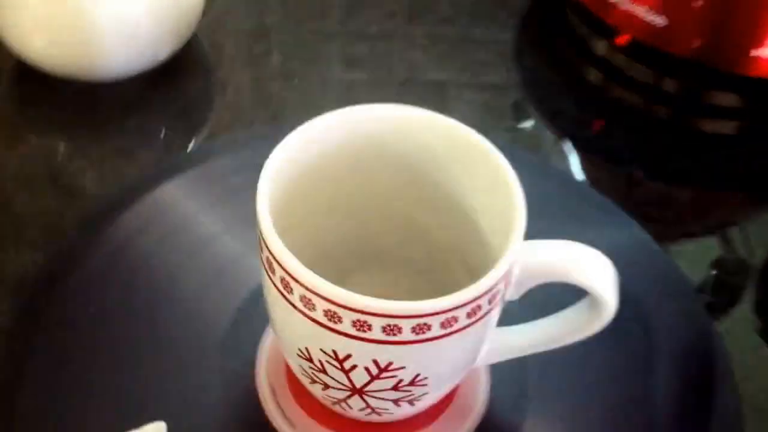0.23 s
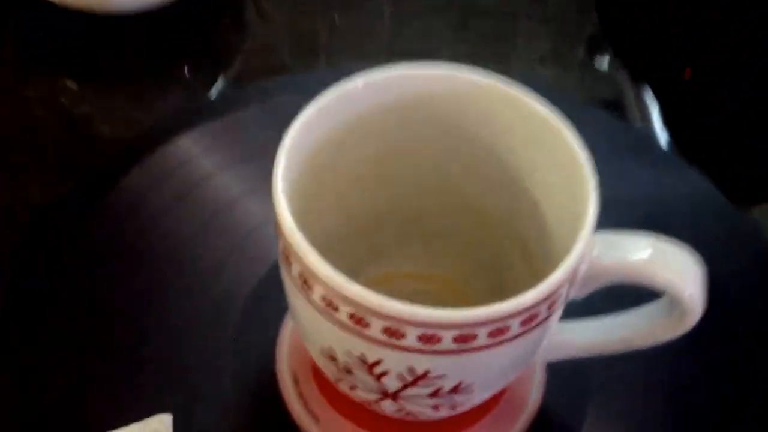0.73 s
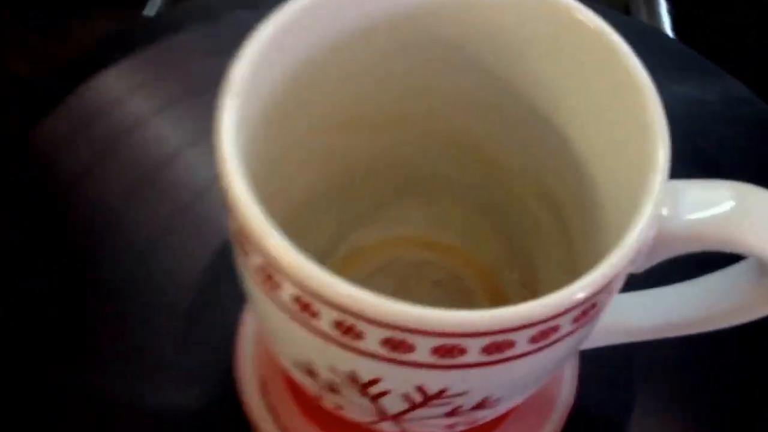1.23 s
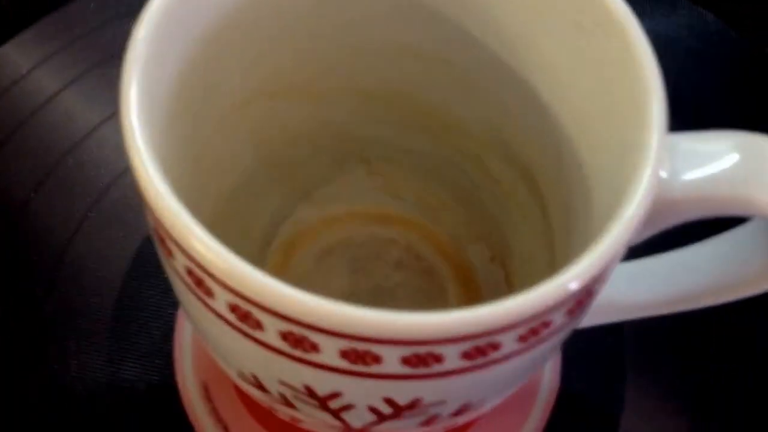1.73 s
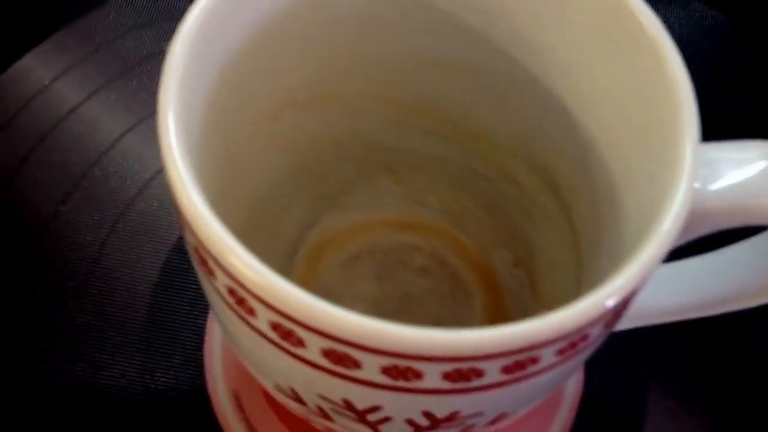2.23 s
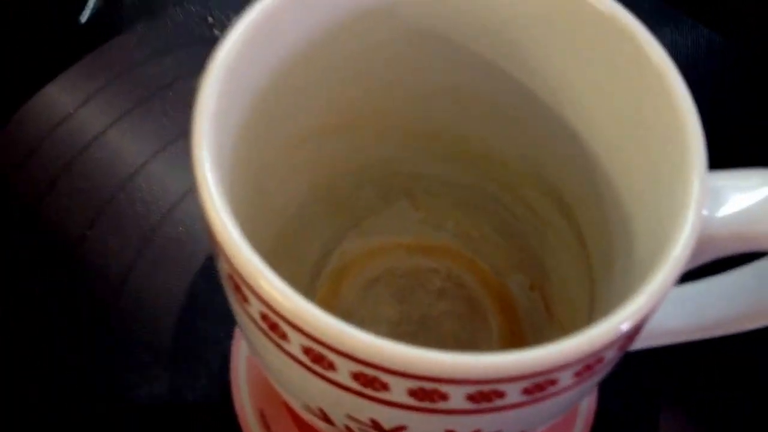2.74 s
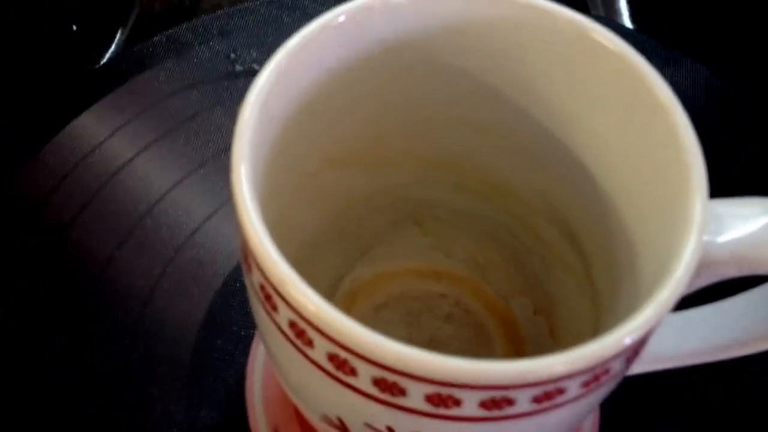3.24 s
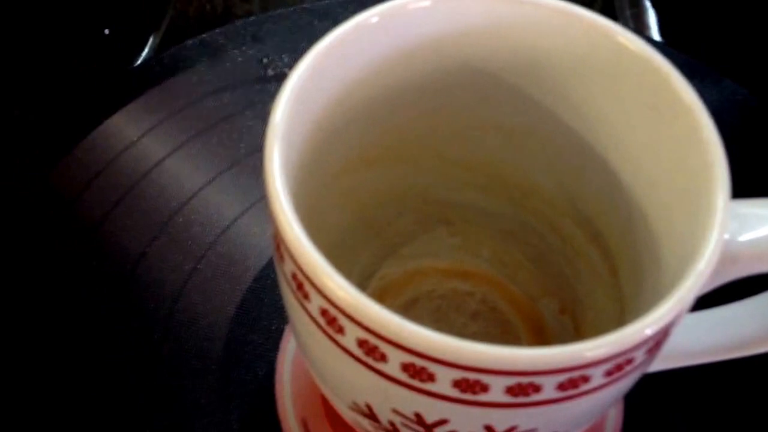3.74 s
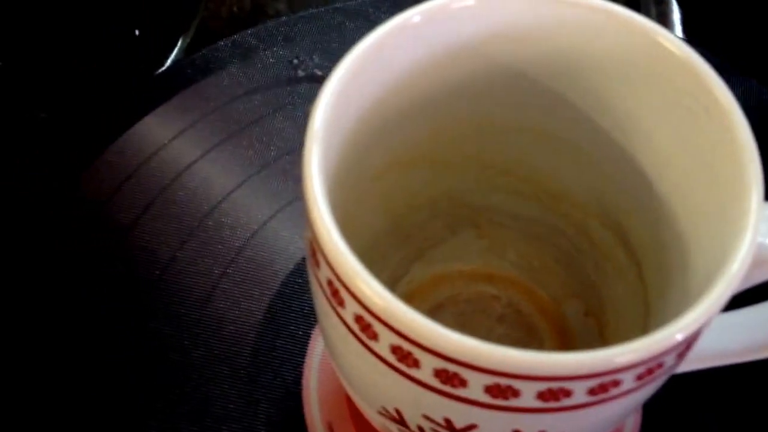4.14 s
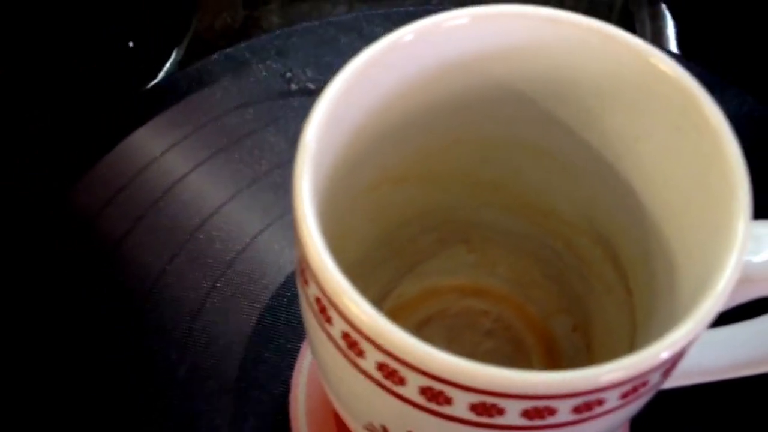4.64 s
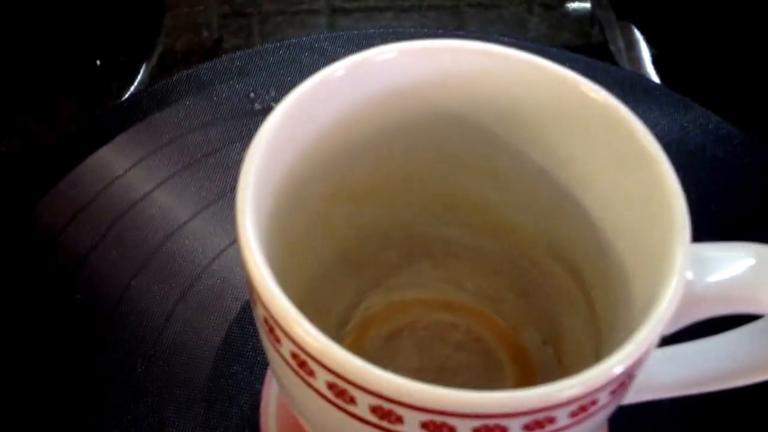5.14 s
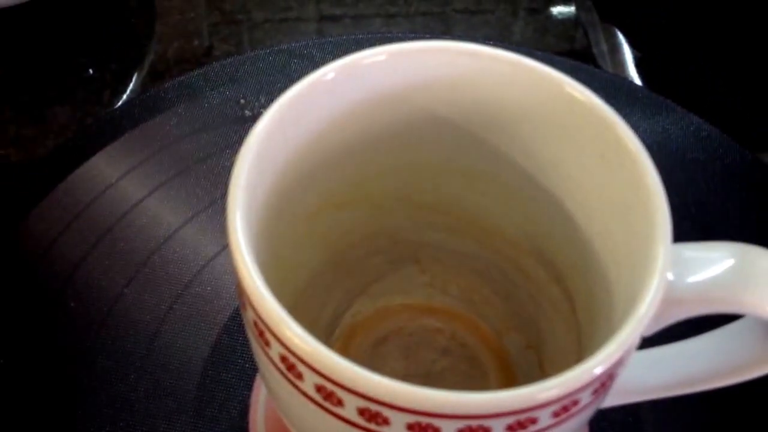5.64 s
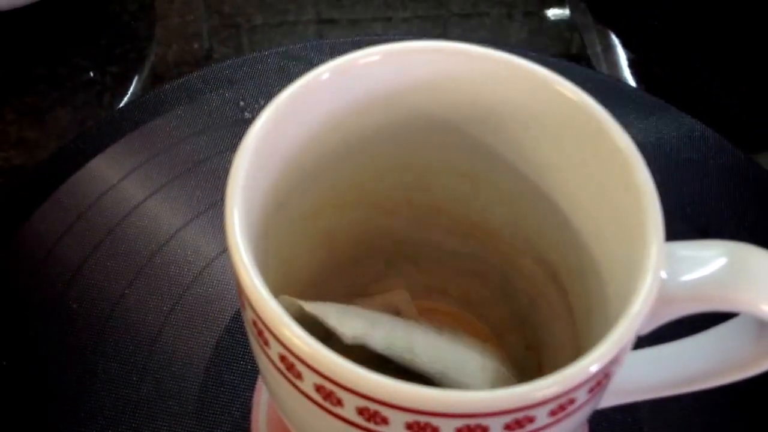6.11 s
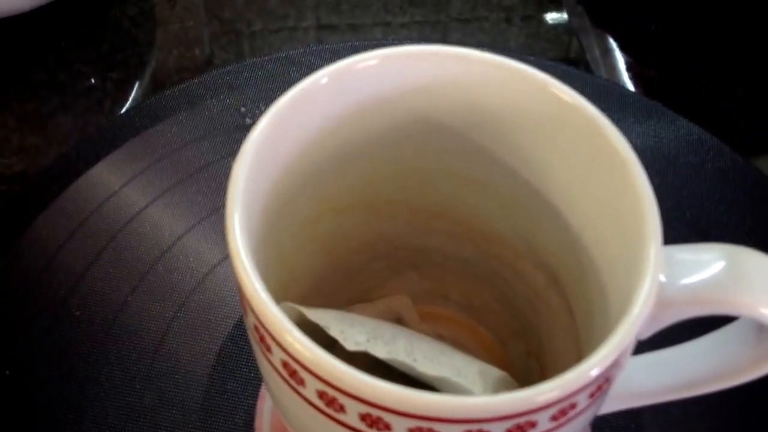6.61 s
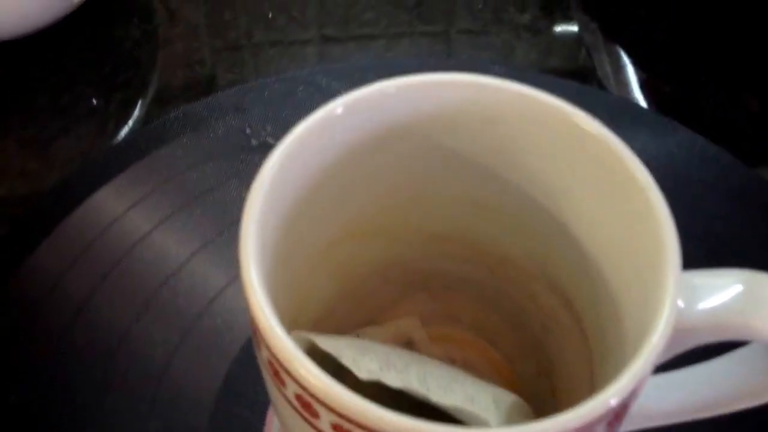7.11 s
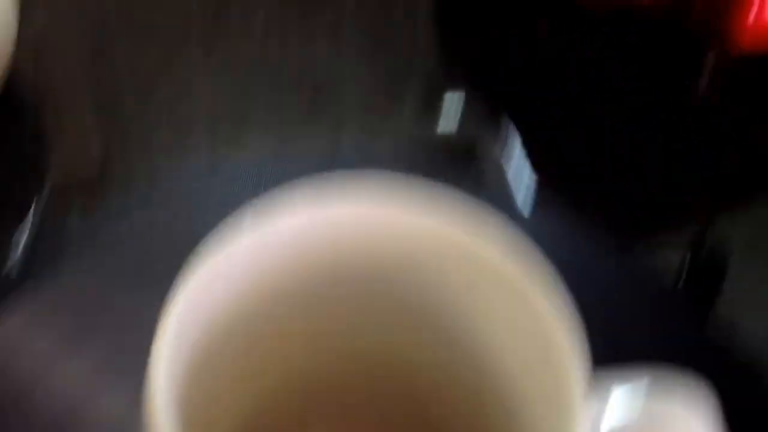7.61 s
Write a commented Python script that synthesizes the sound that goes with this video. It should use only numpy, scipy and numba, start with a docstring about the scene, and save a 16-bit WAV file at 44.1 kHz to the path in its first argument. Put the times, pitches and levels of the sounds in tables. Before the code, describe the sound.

From the start an electric kettle is boiling hard: a deep, fluttering rumble around the low hundreds of hertz, gurgling mid tones, a grainy metallic ringing from the steel wall that sings a little more around 1 second, and soft flickering steam. At about 2.1 the heating ends, but the boil holds until 2.5, where one small dull bubble snap sounds. At 2.95 the switch slips faintly, then snaps with a loud bright clack at 2.98, followed by tiny rattles until 3.1. A thin high hiss swells to 3.5 and vanishes. The rumble and bubbling ebb slowly. At 6.13 to 6.18 a tea bag makes two or three crisp papery ticks against a mug. From 7.57 the boil falls quickly, treble first, as the phone turns; a finger knocks its case at 7.64, with faint ticks and rising sliding to the end. Small kitchen echo, slight microphone hiss.

```python
"""Kettle boiling and switching off

An electric kettle boils on a kitchen counter, close to a hand-held phone, and its switch snaps off.
Big bubbles drum the body, small ones ring the steel wall, and steam hisses; all ebb as the water calms.
A tea bag drops into a mug with a paper crinkle, and a finger taps and slides on the phone case.
Bubbles and blows are random ticks sent through ringing filters; steam is coloured noise.
The phone colours the sound, adds its own hiss and turns itself down after loud peaks.
"""
import sys
import numpy as np
from scipy import signal
from scipy.fft import rfft, irfft, next_fast_len
from scipy.io import wavfile
from scipy.ndimage import uniform_filter1d
from numba import njit

SR = 44100
rng = np.random.default_rng(int(sys.argv[2]) if len(sys.argv) > 2 else 0)


def put_to_file(sound):
    """Save the sound as 16-bit audio at rate SR, in the file named by the first command-line argument."""
    columns = np.atleast_2d(sound).T  # one column per channel
    safe = np.clip(columns, -1, 1)
    whole_steps = np.round(safe * 32767)
    wavfile.write(sys.argv[1], SR, whole_steps.astype(np.int16))


N = 346626
T = np.arange(N) / SR  # time of each sample, s
SIZE = next_fast_len(N + SR)  # spare room lets echoes die out
HZ = np.arange(SIZE // 2 + 1) * SR / SIZE + 1e-3  # tiny offset avoids dividing by zero

# Kettle body, drummed by big bubbles [f/Hz, width/Hz, level/dB]
BODY_MODES = [(90.5, 38, -19.5), (166.3, 32, 1.5), (215, 61, -4), (265.2, 43, -0.5), (540.5, 108, -20),
              (317, 36, -25), (621, 110, -22), (743, 128, -19)]
# Air under the lid [f/Hz, width/Hz, level/dB]
LID_AIR_MODES = [(393.8, 49.3, 3), (428, 30, -4.5)]
# Gurgling water [f/Hz, width/Hz, level/dB]
GURGLE_MODES = [(906, 140, 0.53), (1085, 380, 0.1)]
# Steel wall [f/Hz, width/Hz, level/dB, lift while the phone hovers over the mug/dB]
WALL_MODES = [(1415, 112, -6, 1), (1518, 89, -5.5, 1), (1617, 71, 0, 0.5), (1734, 126, 1, -5.5),
              (1836, 91, 1.5, -1.5), (1968, 150, -3.5, 0), (2108, 100, -6.5, -4), (2210, 125, -3, -1),
              (2424, 310, -7.5, -0.5), (2580, 103, -6, 1), (2682, 70, -5, 6), (2786, 220, -8, -5.5),
              (2943, 130, -10, 4.5), (3200, 224, -6, -2), (3840, 2100, -16.5, -1.5), (3870, 230, -19.5, -2)]
# Colour of the steam hiss [f/Hz, level/dB]
STEAM_COLOUR = [(3000, -18), (5000, -4), (6200, -0.5), (6750, 4), (7100, -3.5), (7550, 1.5), (8200, -2),
                (9000, -4), (11000, -4), (15000, -2)]
# Colour of a thin, high hiss [f/Hz, level/dB]
THIN_HISS_COLOUR = [(3000, -25), (5000, -12), (10000, -3), (12500, -1), (15000, -1)]

# Switch: the lever slips, catches, snaps over, bounces, rattles out
# [t/s, level/dB, fade time/s, treble tilt/dB]
SWITCH_BLOWS = [(2.9505, -29, 0.0087, -10), (2.966, -27, 0.0044, -8), (2.9725, -24, 0.0025, -5),
                (2.9754, -10, 0.0021, 3.5), (2.9768, -7, 0.0019, 4), (2.9795, -10, 0.002, 5),
                (2.9825, -12, 0.0041, 0), (2.987, -24, 0.0055, -3), (2.995, -25, 0.0071, 0),
                (3.007, -22.5, 0.0057, -10), (3.019, -27, 0.0093, -12), (3.028, -35, 0.0091, -10),
                (3.038, -32, 0.0074, -13), (3.047, -33, 0.0066, -15), (3.056, -34, .006, -7),
                (3.075, -38, 0.0084, -5), (3.09, -47, .02, -2)]
# Broad clack of the switch [f/Hz, level/dB]
CLACK_COLOUR = [(60, -6), (300, -7), (600, -8), (1000, 2.5), (2500, -6.5), (4600, 5), (6000, 2.5),
                (8000, 9.5), (11000, 5.5), (15000, -1)]
# Rings of lever and body [f/Hz, level/dB, time to fade by 60 dB/s]
SWITCH_RINGS = [(275, -32, 0.057), (528, -36.5, 0.079), (880, -33, 0.015), (1410, -33.5, 0.037),
                (2170, -37, .015), (2580, -24.5, 0.013), (3020, -38, .01), (3350, -37, 0.015),
                (4480, -24.5, 0.006), (7400, -30, 0.012), (7965, -28.5, 0.032), (8900, -35, .016),
                (11300, -26, .008)]

# A lone bubble snaps against the wall [t/s, level/dB]
POP_TIMES = [(2.51, -21)]
# Colour of that snap [f/Hz, level/dB]
POP_COLOUR = [(800, -25), (1600, 2), (2900, 6), (4200, -14), (8000, -30)]

# Tea bag: touches the mug, folds, settles [t/s, level/dB, fade time/s, treble tilt/dB]
TEA_BAG_BLOWS = [(6.1348, -18, 0.0013, -4), (6.1355, -21, .0018, -2), (6.139, -33, 0.013, 0),
                 (6.1557, -19, 0.00089, -3), (6.1575, -23, 0.0022, 6), (6.1645, -30, .002, 3),
                 (6.1615, -25, .0025, 1), (6.169, -34, .003, 2), (6.172, -45, .03, 7),
                 (6.1815, -35, 0.005, 3)]
# Colour of the crinkling paper [f/Hz, level/dB]
PAPER_COLOUR = [(900, -15), (1800, -11), (3300, -1.5), (4600, -8.5), (8000, -1), (12000, 5), (15000, -6)]
# Rings of the mug [f/Hz, level/dB, time to fade by 60 dB/s]
MUG_RINGS = [(2240, -32, 0.022), (2930, -29.5, 0.014), (3570, -43, .01), (4400, -39, .008),
             (7200, -41, .01)]

# Finger on the phone case [t/s, push level/dB, contact time/ms, tick level/dB]
FINGER_TAPS = [(7.6427, -15, 0.86, -25), (7.647, -37, .7, -40), (7.654, -42, .85, -34),
               (7.68, -42, 0.95, -30), (7.71, -45, .6, -47), (7.791, -49, 0.52, -40)]
# The case passes little bass [f/Hz, level/dB]
CASE_COLOUR = [(200, -12), (450, 4), (850, -4), (1600, -3), (2800, 6.5), (4200, 4)]
# Rings of the case [f/Hz, level/dB, time to fade by 60 dB/s]
CASE_RINGS = [(235, -21, .04), (845, -26.5, 0.0078), (2600, -21, 0.0022)]
# Colour of skin ticking and sliding [f/Hz, level/dB]
SKIN_COLOUR = [(2500, -23), (4000, -4), (5200, 6), (6500, -5), (8000, -9.5), (10500, -1), (13000, 4),
               (15000, 7)]

# Microphone port: bass cut, a notch from the case, a treble peak [f/Hz, level/dB]
MICROPHONE_COLOUR = [(20, -7), (70, -16), (130, 1.5), (200, 0), (3500, -0.5), (4400, -9.5), (5100, -19.5),
                     (6000, -10.5), (7500, 1), (9200, -7), (10200, -16), (12500, -16), (15000, -21.5)]

OFF_S, STORED_HEAT_S = 2.07, 0.42  # the element goes off; the plate stays hot a little longer
TURN_S, TURN_DB_S, TURN_TREBLE_DB_S = 7.57, -8.5, -34  # the phone swings aside, treble drops fastest
HOVER_S, HOVER_FADE_S = (1.4, 2.86), 0.16  # the phone hovers over the mug; half of each fade
SINGING_HZ, SINGING_OCTAVES = 1850, 0.16  # wall modes near this pitch sing out early on
CHURN_DB, CHURN_PER_S, CHURN_OCTAVES = 7, 38, 0.6  # clusters of bubbles near the singing pitch
CHURN_EVEN_S = 0.14  # the clusters even out over this time
KITCHEN_T60_S, KITCHEN_DB, BOIL_ECHO_DB, MUG_ECHO_DB = 0.28, -12, -12, -17  # echo fade and levels
SELF_NOISE_DB = -49  # microphone hiss, before its colour
GAIN_TOP_DB, GAIN_SLOPE = -23, 0.56  # above this level the phone turns down this share of the excess
GAIN_ATTACK_S, GAIN_RELEASE_S = 0.017, 1.88
CEILING, TOP_HZ = 0.84, 15350  # soft clipping ceiling (full scale is 1); top cut


def kettle():
    """Adds six boiling noises; bursts at the surface make the upper ones surge, save the thin hiss."""
    surge = surges(30, 0.0073)
    rush = gurgling(surge) + ringing_wall(surge) + steam_hiss(surge) + thin_hiss()
    # the kettle stands further off, so its rush carries some echo
    return rumble() + kitchen(rush, BOIL_ECHO_DB)


def rumble():
    """Big bubbles shake the kettle body and the air under the lid."""
    body = shaken(BODY_MODES, 2500, 2.15, 1.5, 6.8, drift=0.00995)
    lid_air = shaken(LID_AIR_MODES, 2500, 2.13, 0.93, 5.3)
    body_db = vigour(-34, drift_db_s=0.089, ebb_db_s=-0.76)
    lid_db = vigour(-39.5, drift_db_s=0.59, ebb_db_s=-1.5)
    return level(body, body_db) + level(lid_air, lid_db)


def gurgling(surge):
    """Bubbles excite two broad water resonances, which swell early on."""
    water = shaken(GURGLE_MODES, 2000, 2.4, 1.0, 15)
    early_db = np.maximum(swell(1.25, 2.5, rise_db_s=1.2, fall_db_s=14), -0.5)
    water_db = vigour(-56.5, drift_db_s=-0.24, ebb_db_s=-1.5) + early_db
    return level(water, water_db) * np.sqrt(0.68 + 0.2 * surge)


def ringing_wall(surge):
    """Small bubbles ring the steel wall; the sloshing water bends each mode's pitch a little."""
    singing_db = np.maximum(swell(1.06, 2.2, rise_db_s=6.2, fall_db_s=11), -1.5)
    wall = shaken(WALL_MODES, 2500, 2.8, 2.3, 18, singing_db, churn(), wander_db=2.1, drift=0.008)
    wall_db = vigour(-41, drift_db_s=-0.56, ebb_db_s=-1.45)
    return level(wall, wall_db) * np.sqrt(0.79 + 0.11 * surge)


def steam_hiss(surge):
    """Steam is coloured noise whose level flickers."""
    steam = through(rng.standard_normal(N), colour(STEAM_COLOUR))
    steam_db = vigour(-44.5, drift_db_s=0.14, ebb_db_s=-1.97, turn_db_s=TURN_TREBLE_DB_S)
    return level(steam, steam_db + 0.7 * walk(16)) * np.sqrt(0.72 + 0.22 * surge)


def thin_hiss():
    """High, flickering noise swells through the snap, then soon falls away."""
    thin = through(rng.standard_normal(N), colour(THIN_HISS_COLOUR))
    return level(thin, swell(3.5, -41, rise_db_s=16, fall_db_s=150) + 1.9 * walk(11))


def shaken(modes, per_s, spread_db, patch_db, patch_rate, singing_db=0, churn_db=0, wander_db=0, drift=0):
    """Each mode is shaken by its own patch of bubbles, which flickers and may wander; its pitch may drift."""
    out = 0
    hover_times = np.add.outer(HOVER_S, [-HOVER_FADE_S, HOVER_FADE_S]).ravel()
    hover = np.interp(T, hover_times, [0, 1, 1, 0])
    for mode in modes:
        octaves = np.log2(mode[0] / SINGING_HZ)
        patch = patch_db * walk(patch_rate) + wander_db * walk(1.68)
        patch = patch + sum(mode[3:]) * hover  # only the wall has a hover lift
        patch = patch + singing_db * np.exp(-(octaves / SINGING_OCTAVES) ** 2)
        patch = patch + churn_db * np.exp(-(octaves / CHURN_OCTAVES) ** 2)
        hits = bubbles(per_s, spread_db) * undb(patch)
        ring = through(hits, resonances([mode[:3]], order=2))
        # reading the ring at an uneven speed bends its pitch
        bent = np.cumsum(1 + drift * walk(3.0))
        out = out + np.interp(bent * (N - 1) / bent[-1], np.arange(N), ring)
    return out


def bubbles(per_s, spread_db):
    """Bubbles collapse at random moments, most of them small, a few large."""
    hit = rng.random(N) < per_s / SR
    size_db = spread_db * np.minimum(rng.exponential(size=N), 5)
    return hit * rng.standard_normal(N) * undb(size_db)


def surges(per_s, fade_s):
    """Power that swells when a large bubble bursts at the surface, then fades; mean 1."""
    burst_power = (rng.random(N) < per_s / SR) * rng.random(N)
    soft_bursts = uniform_filter1d(burst_power, size=300)
    power = signal.lfilter([1], [1, -np.exp(-1 / (fade_s * SR))], soft_bursts)
    return power / np.mean(power)


def churn():
    """Clusters of bubbles swell and thin together, in dB, level on the whole."""
    db = CHURN_DB * walk(CHURN_PER_S)
    return db - uniform_filter1d(db, int(CHURN_EVEN_S * SR))


def vigour(db, drift_db_s, ebb_db_s, turn_db_s=TURN_DB_S):
    """Boil level in dB: drifts while heating, holds on stored heat, ebbs, drops as the phone turns."""
    heating = drift_db_s * np.minimum(T - OFF_S, 0)
    calming = ebb_db_s * np.maximum(T - OFF_S - STORED_HEAT_S, 0)
    turning = turn_db_s * np.maximum(T - TURN_S, 0)
    return db + heating + calming + turning


def switch():
    """Each blow makes a broad clack with a few short rings of lever and body."""
    response = colour(CLACK_COLOUR) + struck(SWITCH_RINGS)
    return blows(SWITCH_BLOWS, response, per_s=25000, contact_db=4)


def pops():
    """A lone bubble hits the wall with a short dull snap."""
    table = [(s, db, 0.002, 0) for s, db in POP_TIMES]
    return blows(table, colour(POP_COLOUR), per_s=22000, contact_db=6)


def tea_bag():
    """Separate grains of paper crinkle, faintly ringing the mug."""
    response = colour(PAPER_COLOUR) + struck(MUG_RINGS)
    return blows(TEA_BAG_BLOWS, response, per_s=20000, contact_db=4)


def finger():
    """Each push presses in and springs back, knocking the case; skin ticks at contact and slides."""
    push = 0
    ticks = 0
    for s, push_db, contact_ms, tick_db in FINGER_TAPS:
        u = (T - s) * 4000 / contact_ms
        push = push - 2 * u * undb(push_db) * np.exp(-u ** 2)
        ticks = ticks + burst(s, tick_db, 0.0013)
    ticks = ticks * np.sign(rng.standard_normal(N))
    slide_db = swell(10, -52, rise_db_s=40, fall_db_s=40)  # still rising when the sound ends
    slide = undb(slide_db) * level(bubbles(9000, 2.5), 0)
    knock = through(push, colour(CASE_COLOUR) + struck(CASE_RINGS))
    return knock + through(ticks + slide, colour(SKIN_COLOUR))


def blows(table, response, per_s, contact_db):
    """A hard contact, then a scatter of uneven ticks, through a body; tilt sets how bright it is."""
    ticks = level(bubbles(per_s, 2.9), 0)
    contacts = np.ceil(np.array(table)[:, 0] * SR).astype(int)
    ticks[contacts] = undb(contact_db)
    treble = np.log2((np.maximum(HZ, 2200) + 1500) / 5000)  # flat below 2200 Hz
    out = 0
    for s, db, length, tilt_db in table:
        out = out + through(burst(s, db, length) * ticks, response * undb(tilt_db * treble))
    return out


def kitchen(x, echo_db):
    """Tiles and cupboards return a diffuse echo, made from fading noise."""
    t = T[:SR // 2]
    fade = 1000. ** (-t / KITCHEN_T60_S) * np.minimum(t / 0.0033, 1)
    tail = rng.standard_normal(len(t)) * fade
    echo = tail * undb(echo_db) / np.sqrt(np.sum(tail ** 2))
    return x + through(x, rfft(echo, SIZE))


def undb(db):
    """Turn dB into a plain factor."""
    return 10 ** (np.asarray(db) / 20)


def level(x, db):
    """Even out the average strength of x, then apply a level in dB."""
    return x * undb(db) / np.sqrt(np.mean(x ** 2))


def through(x, response):
    """Filter by a frequency response."""
    return irfft(rfft(x, SIZE) * response, SIZE)[:N]


def colour(table):
    """Filter drawn through (f/Hz, level/dB) points that never sounds ahead of its input."""
    hz, db = np.transpose(table)
    curve_db = np.interp(np.log(HZ), np.log(hz), db)
    # folding the cepstrum (spectrum of the log spectrum) puts all the sound after the start
    cep = irfft(np.log(undb(curve_db)), SIZE)
    cep[1:SIZE // 2] *= 2
    cep[SIZE // 2 + 1:] = 0
    return np.exp(rfft(cep))


def resonances(table, order):
    """Sum of band-pass resonances, each applied order times."""
    out = 0
    for hz, width, db in table:
        detune = (HZ ** 2 - hz ** 2) / (HZ * width)
        out = out + undb(db) * (1 + 1j * detune) ** -order
    return out


def struck(modes):
    """Ringing modes whose starting swing is set by their dB."""
    table = []
    for hz, db, t60 in modes:
        width = np.log(1000) / np.pi / t60
        table.append((hz, width, db - 20 * np.log10(width / SR * 2 * np.pi)))
    return resonances(table, order=1)


def walk(rate):
    """Random levels, a new one every 1 / rate s, smoothed twice."""
    k = int(SR / rate)
    steps = np.repeat(rng.standard_normal(N // k + 1), k)
    return 0.52 * uniform_filter1d(uniform_filter1d(steps, k), k)[:N]


def burst(s, db, length):
    """Envelope that jumps up at s and fades."""
    return undb(db) * (T > s) * np.exp(-np.maximum(T - s, 0) / length)


def swell(peak_s, peak_db, rise_db_s, fall_db_s):
    """Level in dB that climbs to a peak and falls away."""
    return peak_db - np.maximum(rise_db_s * (peak_s - T), fall_db_s * (T - peak_s))


@njit
def follow(x, attack, release):
    """Envelope that rises fast and falls slowly."""
    out, e = np.empty(len(x)), 0.
    for i in range(len(x)):
        e += (abs(x[i]) - e) * (attack if abs(x[i]) > e else release)
        out[i] = e
    return out


def scene():
    """Kettle, switch and bubble snap, tea bag and finger together; all but the finger have echo."""
    snaps = kitchen(switch() + pops(), KITCHEN_DB)
    mug = kitchen(tea_bag(), MUG_ECHO_DB)
    return (kettle() + snaps + mug + finger())[None]


def record(dry):
    """Port colour and self-noise, gain that ducks after loud peaks, soft clipping, steep top cut."""
    noise = undb(SELF_NOISE_DB) * rng.standard_normal(N)
    x = through(dry[0] + noise, colour(MICROPHONE_COLOUR))
    envelope = follow(x, 1 / (GAIN_ATTACK_S * SR), 1 / (GAIN_RELEASE_S * SR))
    x = x * np.minimum(undb(GAIN_TOP_DB) / (envelope + 1e-9), 1) ** GAIN_SLOPE
    x = CEILING * np.tanh(x / CEILING)
    top_cut = signal.ellip(12, 0.2, 80, TOP_HZ, fs=SR, output="sos")
    return signal.sosfilt(top_cut, x)[None]


dry = scene()
out = record(dry)
put_to_file(out)
```